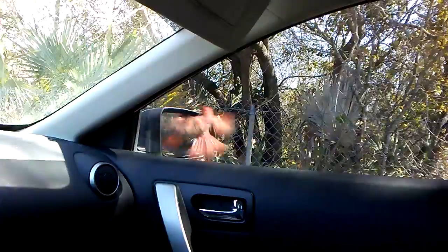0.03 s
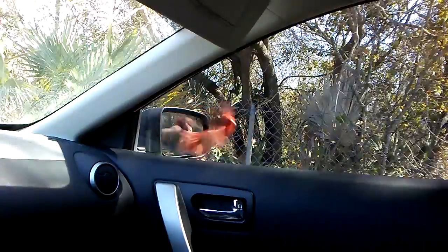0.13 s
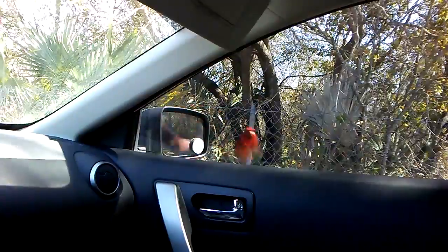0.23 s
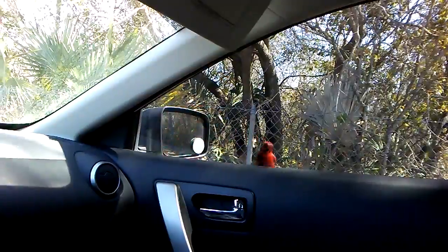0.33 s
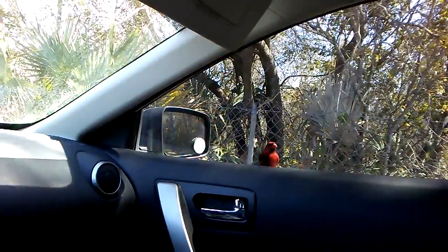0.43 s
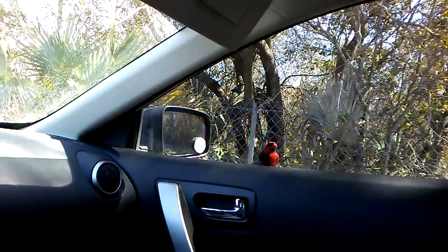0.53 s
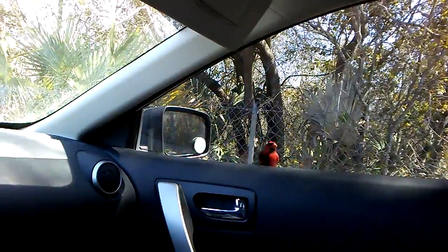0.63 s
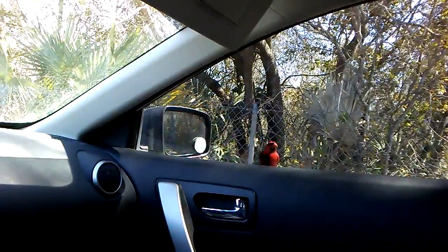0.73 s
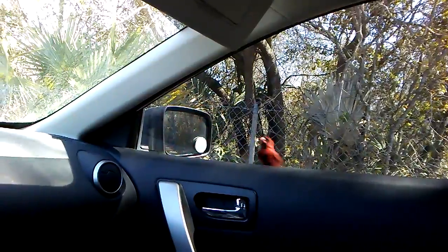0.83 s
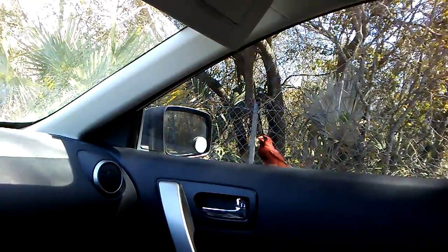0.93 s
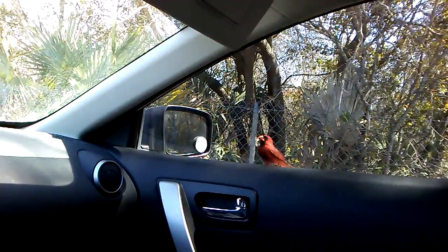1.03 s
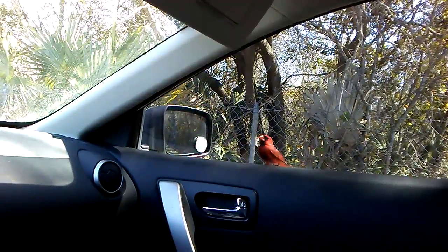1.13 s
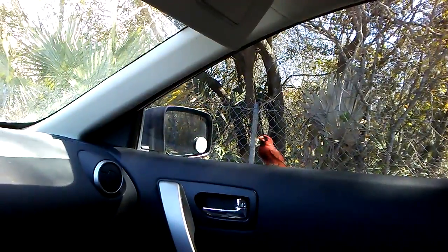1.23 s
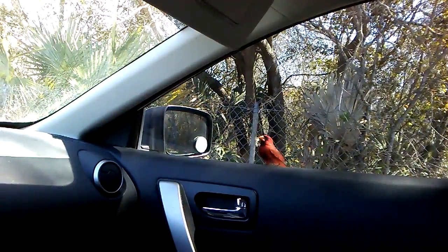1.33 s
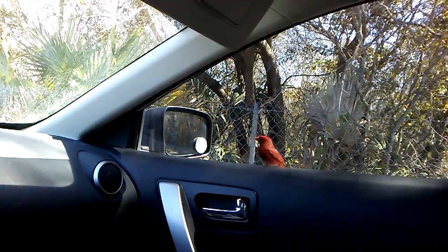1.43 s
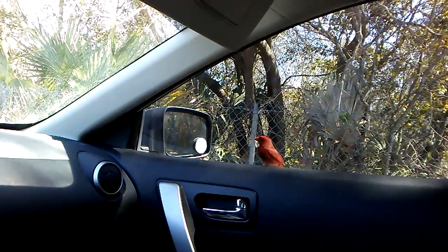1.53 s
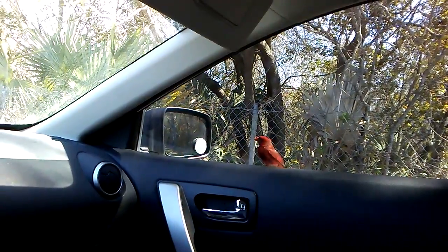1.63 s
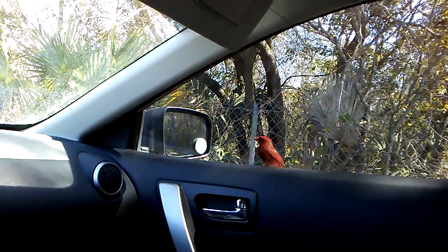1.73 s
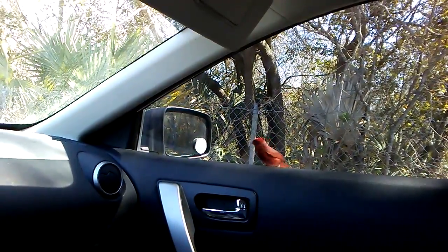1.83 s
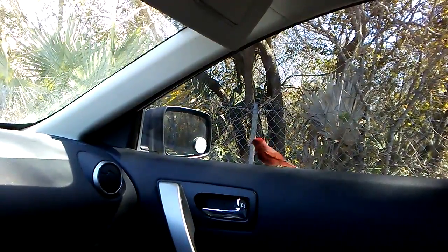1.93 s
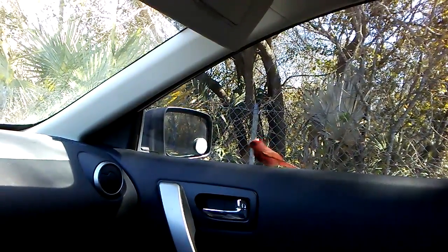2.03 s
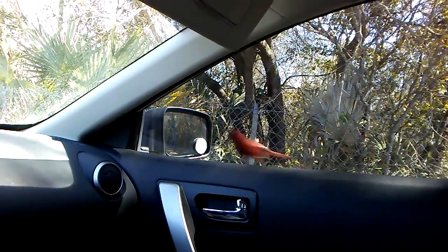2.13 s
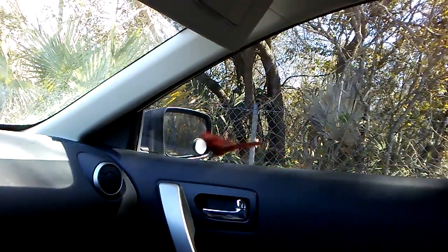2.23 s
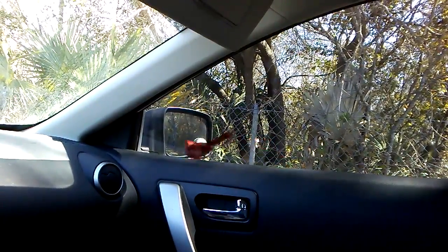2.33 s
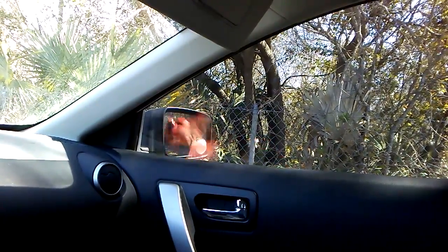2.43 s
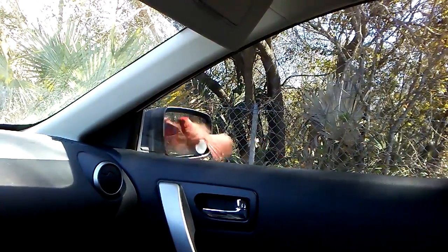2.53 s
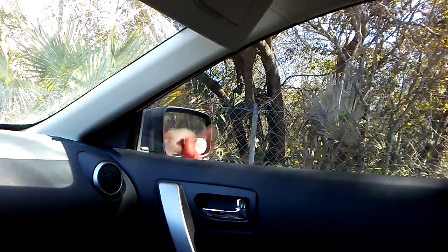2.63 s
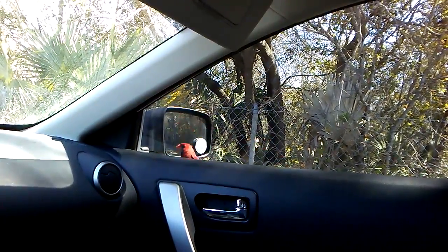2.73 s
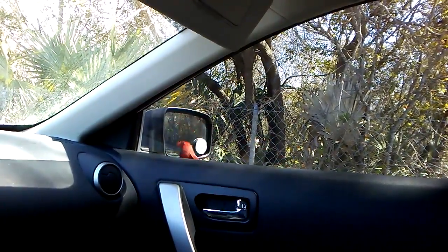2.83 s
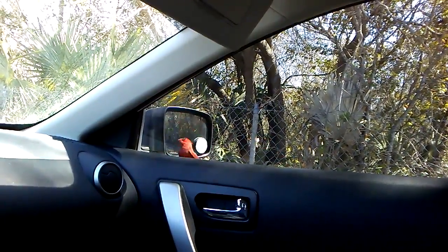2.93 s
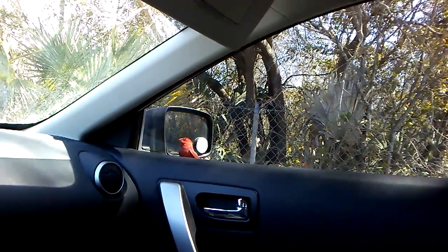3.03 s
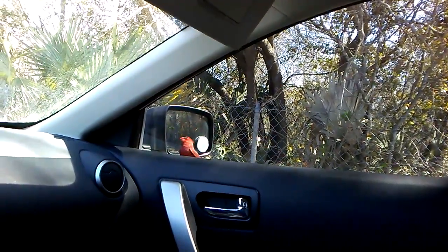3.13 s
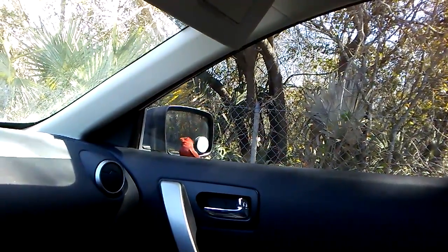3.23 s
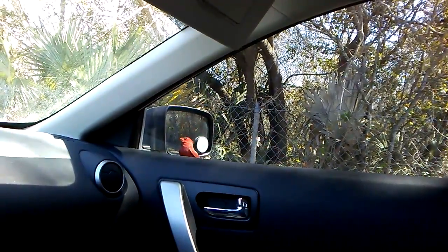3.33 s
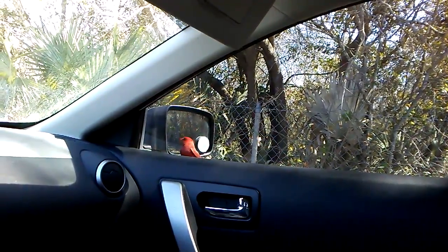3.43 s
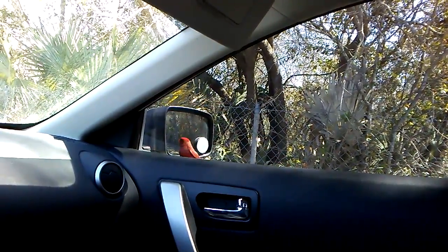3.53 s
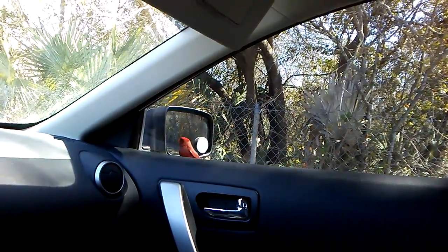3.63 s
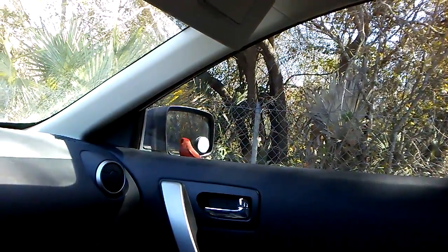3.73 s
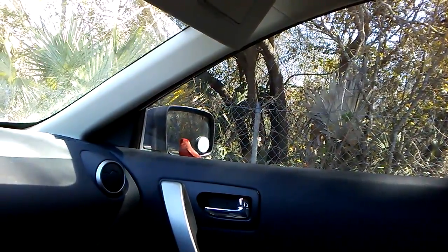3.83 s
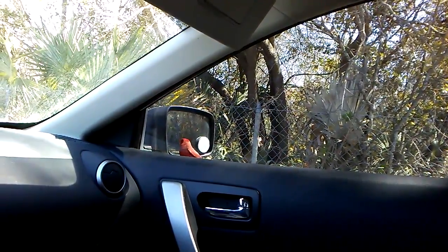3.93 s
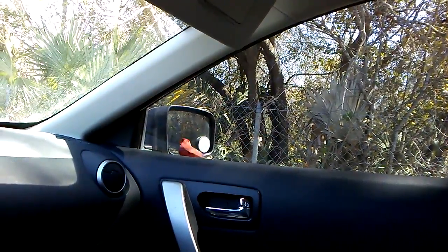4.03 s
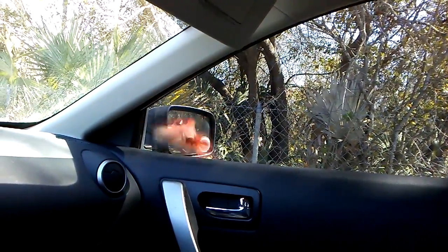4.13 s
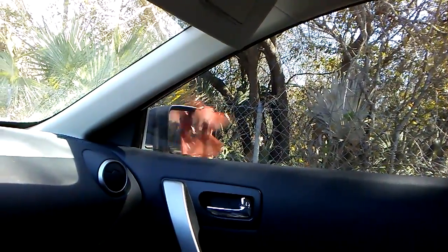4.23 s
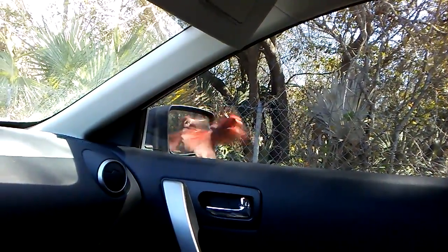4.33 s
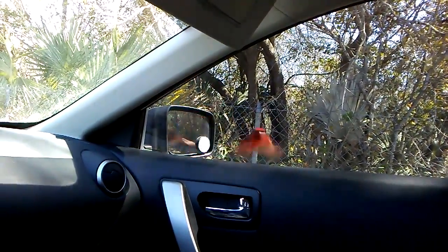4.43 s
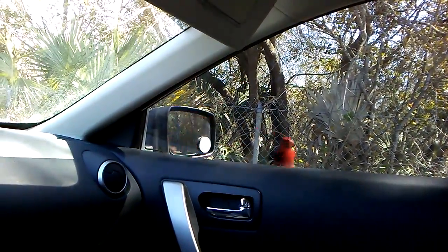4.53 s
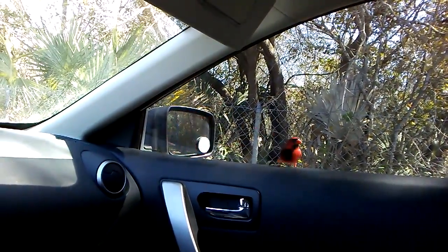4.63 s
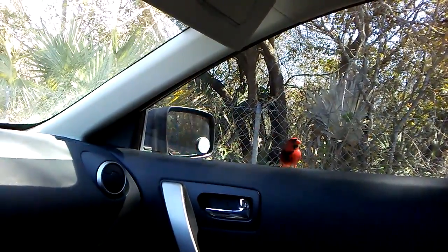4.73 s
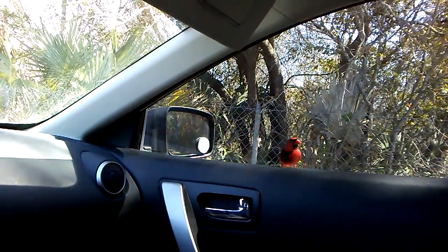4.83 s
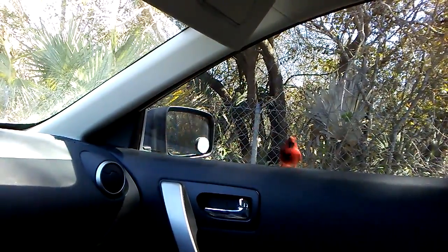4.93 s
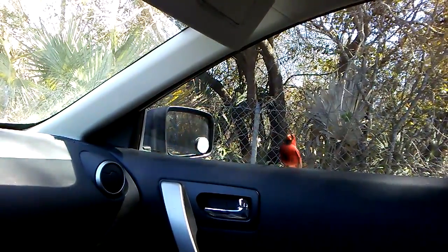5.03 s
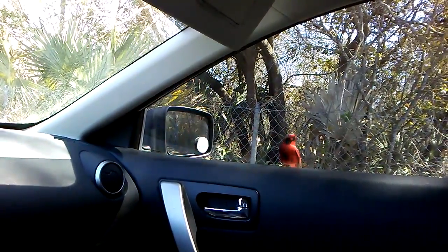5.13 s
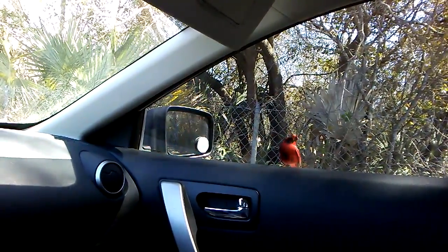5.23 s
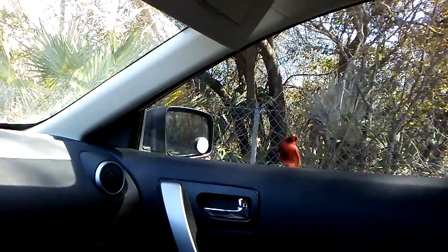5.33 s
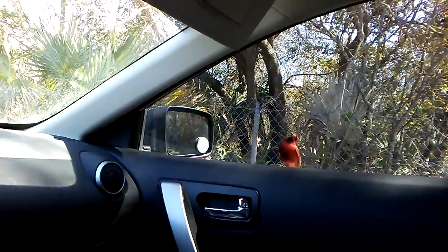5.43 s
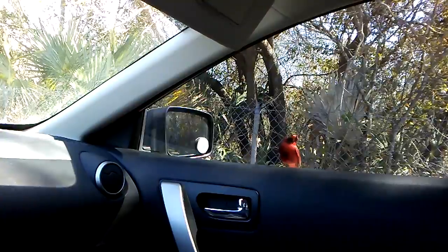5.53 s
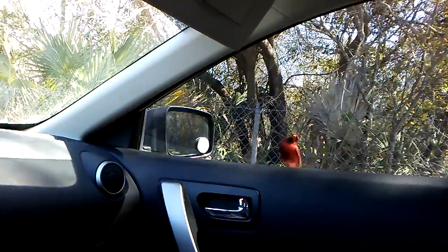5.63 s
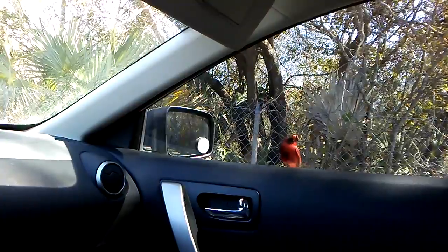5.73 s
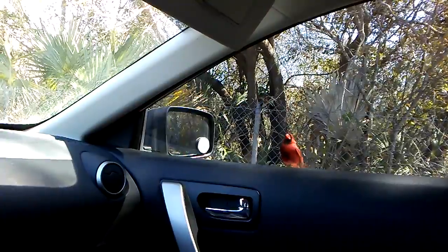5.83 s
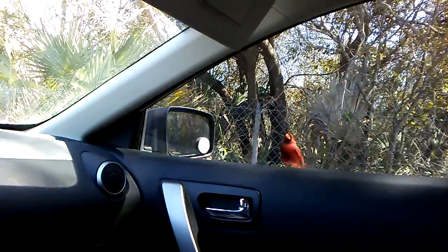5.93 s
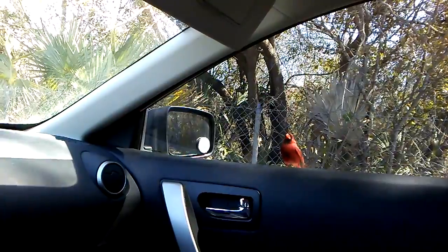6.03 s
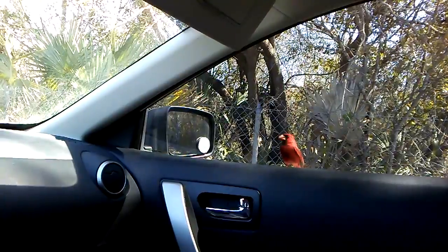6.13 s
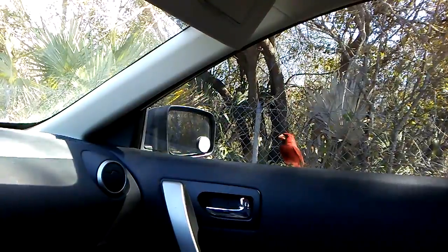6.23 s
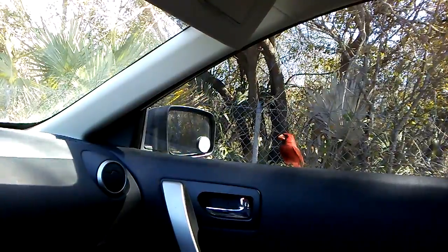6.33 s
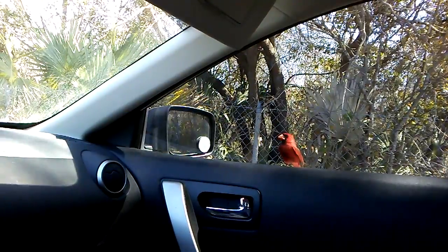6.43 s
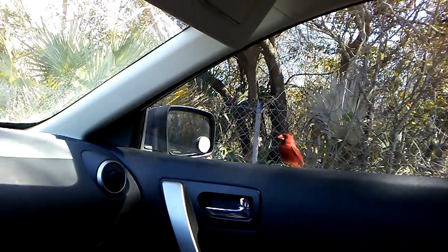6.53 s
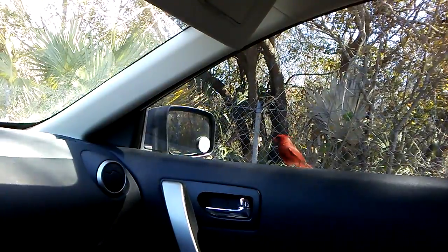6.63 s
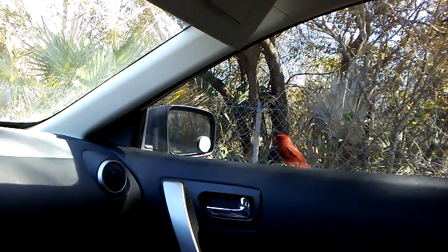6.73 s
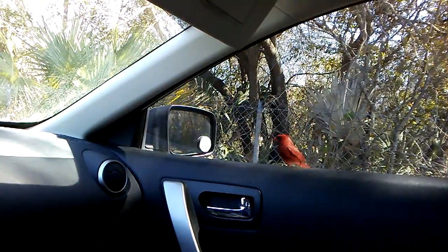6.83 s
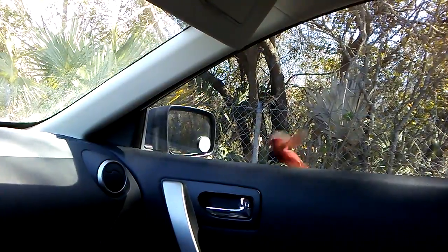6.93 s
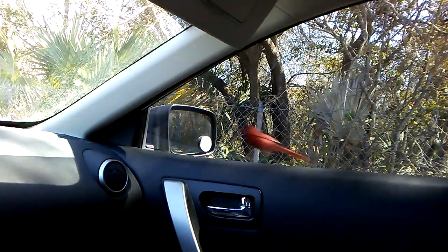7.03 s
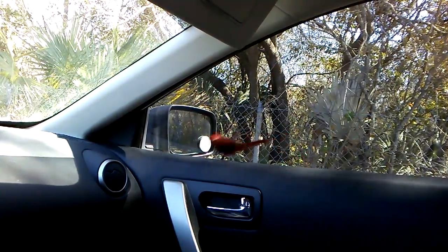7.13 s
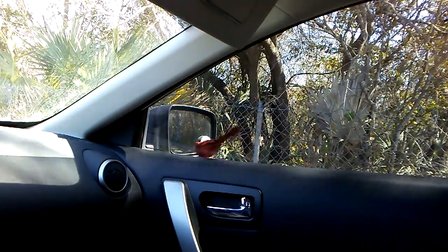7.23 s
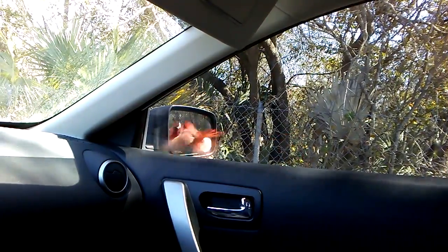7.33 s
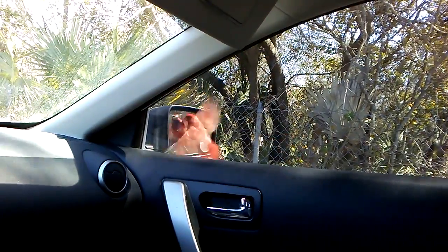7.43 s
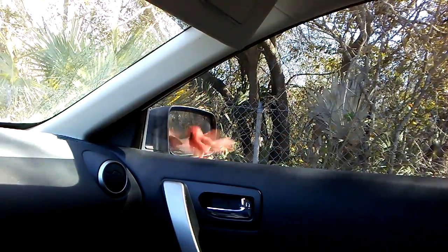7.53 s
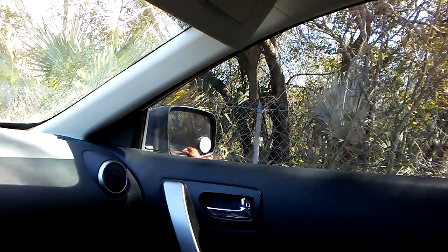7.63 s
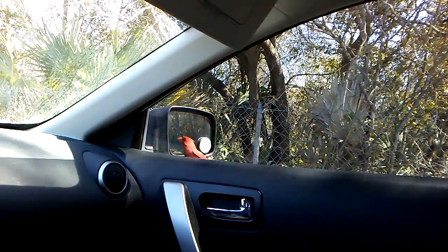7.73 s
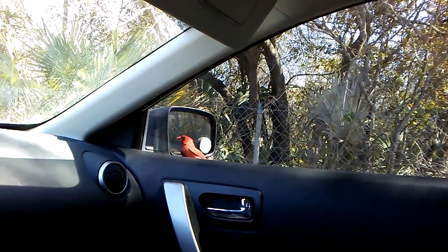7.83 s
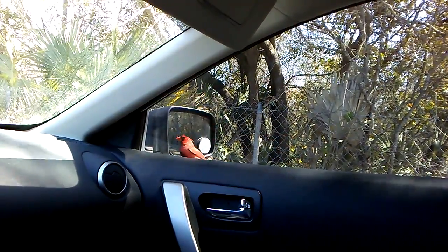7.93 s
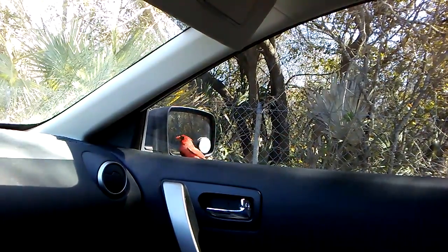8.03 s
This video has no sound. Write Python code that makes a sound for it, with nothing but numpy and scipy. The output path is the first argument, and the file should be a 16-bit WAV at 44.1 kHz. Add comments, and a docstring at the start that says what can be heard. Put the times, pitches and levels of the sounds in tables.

```python
"""A small bird knocks at the side mirror of a parked car, heard on a phone inside with the windows shut.
Between blows its claws tap and its feet and feathers scuff on the door ledge. Knocks and taps are short
pushes ringing decaying modes, with noise bursts for rattle; scuffs are grainy filtered noise.
Wind rumbles and thumps as resonant noise and short low tones; far engines drone as wavering tones.
Leaves and distant road come dulled through the glass, over the flickering hiss of the phone."""
import sys
import numpy as np
from scipy import signal
from scipy.fft import rfft, irfft, next_fast_len
from scipy.io import wavfile
from scipy.ndimage import uniform_filter1d

SR = 44100
rng = np.random.default_rng(int(sys.argv[2]) if len(sys.argv) > 2 else 0)


def put_to_file(sound):
    """Save the sound as 16-bit audio at rate SR, in the file named by the first command-line argument."""
    columns = np.atleast_2d(sound).T  # one column per channel
    safe = np.clip(columns, -1, 1)
    whole_steps = np.round(safe * 32767)
    wavfile.write(sys.argv[1], SR, whole_steps.astype(np.int16))


N = 356504

# modes of the door ledge and window pane: mode_hz, level_db, t60_s, polarity (sign at the microphone)
LEDGE_MODES = [(137.7, -38.5, 0.14, -1), (197, -33, 0.032, 1), (342, -41, 0.063, -1), (447, -39.5, 0.07, 1),
               (500, -50.5, 0.1, -1), (670, -55, 0.13, 1), (745, -74, 0.11, -1), (1092, -36.5, 0.068, 1),
               (1140, -36.5, 0.053, -1), (1350, -46, 0.054, 1), (1650, -42.5, 0.032, -1),
               (1715, -45, 0.073, 1), (1910, -42.5, 0.061, -1), (2003, -49, 0.035, 1),
               (2190, -52, 0.041, 1), (2434, -46.5, 0.05, -1), (2930, -52.5, 0.029, 1),
               (3480, -66, 0.086, -1)]


def undb(db):
    """Decibels to an amplitude factor."""
    return 10 ** (np.asarray(db) / 20)


def unit(x):
    """Scale to an rms of 1."""
    return x / np.sqrt(np.mean(x ** 2))


def walk(rate_hz):
    """A smooth random curve of rms 1: values held for 1 / rate_hz, then averaged twice over that time."""
    hold = int(SR / rate_hz)
    steps = np.repeat(rng.standard_normal(N // hold + 1), hold)
    return unit(uniform_filter1d(uniform_filter1d(steps, hold), hold)[:N])


def noise(gain):
    """Noise of rms 1 whose spectrum follows gain(Hz)."""
    size = next_fast_len(N)
    hz = np.arange(size // 2 + 1) * SR / size + 1  # 1 Hz up, to stay clear of zero
    spectrum = rfft(rng.standard_normal(size)) * gain(hz)
    return unit(irfft(spectrum, size)[:N])


def shape(table):
    """A spectral gain drawn through (Hz, dB) points, straight in dB over log frequency."""
    hz, db = np.transpose(table)
    return lambda f: undb(np.interp(np.log(f), np.log(hz), db))


def add(out, start_s, sound):
    """Mix a sound in at its start time, cut off at the end of the scene."""
    i = int(start_s * SR)
    out[i:i + len(sound)] += sound[:N - i]


def strike(modes, contact_ms, tilt_db, scatter_db, detune):
    """A short push rings every mode; a longer contact mutes the upper ones."""
    hz, db, t60, polarity = np.transpose(modes)[:, :, None]
    t = np.arange(int(.6 * SR)) / SR
    gain = np.sign(polarity) * undb(db + tilt_db[:, None] + scatter_db[:, None])
    tones = np.sin(2 * np.pi * hz * (1 + detune[:, None]) * t)
    decay = np.exp(-np.log(1000) * t / t60)
    ring = (gain * tones * decay).sum(0)
    push_t = t[:400]
    push = push_t * np.exp(-push_t * 1000 * 2 * np.pi / contact_ms)
    return np.convolve(ring, push / push.sum())


def rattle(db, low_hz, high_hz, t60, rise_ms):
    """The many upper modes of trim and glass, too dense to tell apart: a burst of noise that dies away."""
    t = np.arange(int(.25 * SR)) / SR
    band = signal.butter(3, [low_hz, high_hz], "band", fs=SR, output="sos")
    burst = unit(signal.sosfilt(band, rng.standard_normal(len(t))))
    rise = 1 - np.exp(-t * 1000 / rise_ms)
    return undb(db) * burst * rise * np.exp(-np.log(1000) * t / t60)


def hiss(split_hz=6500, low_flicker_db=1.5, high_flicker_db=0.8):
    """Electronic hiss, its two halves flickering apart, stepping up in each supply cycle; a faint whine."""
    # spectrum of the phone's electronics: frequency_hz, relative_density_db
    hiss_spectrum = [(880, -50), (1500, -7.5), (1810, -4), (2520, -2.5), (3060, -3.5), (3690, -4),
                     (15500, -8.5)]
    hiss_db, whine_db, whine_hz = -70.5, -99, 8000
    buzz_hz, buzz_start, buzz_share, buzz_db = 100, .42, .2, 1.3  # start and share in cycles
    t = np.arange(N) / SR
    gate = ((t * buzz_hz - buzz_start) % 1 < buzz_share) * 1.
    whine = undb(whine_db) * (1 + 2 * gate) * np.sin(2 * np.pi * whine_hz * t)  # tripled in the step
    steady = noise(shape(hiss_spectrum))
    low = signal.sosfiltfilt(signal.butter(2, split_hz, fs=SR, output="sos"), steady)
    high = steady - low
    flicker = low * undb(low_flicker_db * walk(60)) + high * undb(high_flicker_db * walk(35))
    return flicker * undb(hiss_db + buzz_db * gate) + whine


def outside(level_db=-67, swell_db=1.0, rustle_db=1.5):
    """Leaves and distant road, dulled by the glass: they swell together, each octave rustling on its own."""
    # outdoor air through the glass: frequency_hz, relative_density_db
    air_spectrum = [(88, -37), (150, 3.5), (189, -12), (253, -7.5), (328, -10), (496, -8), (728, -12.5),
                    (945, -13.5), (1160, -15.5), (2470, -25), (4000, -35.5), (5200, -53), (8800, -120)]
    size = next_fast_len(N)
    air = rfft(noise(shape(air_spectrum)), size)
    # octaves above 125 Hz; the end bands take all that lies beyond them
    octave = np.log2(np.arange(len(air)) * SR / size / 125 + 1e-9).clip(0, 5)
    bands = np.zeros(N)
    for k in range(6):
        band = irfft(air * (1 - abs(octave - k)).clip(0), size)[:N]  # neighbours crossfade
        bands += band * undb(rustle_db * walk(14))
    return bands * undb(level_db + swell_db * walk(0.92))


def drones(waver=0.0159):
    """Far engines: low wavering tones with a fading octave; each swells in, climbs slightly and fades."""
    # engine passages: start_s, length_s, pitch_hz, level_db, octave_db (against the pitch, at the start)
    engines = [(3.8, 1.88, 62.2, -50.5, -5), (2.186, 0.37, 69, -44, -35)]
    swell_s, fade_s = 0.22, 0.11
    climb_db_per_s, octave_sag_db_per_s = 0.5, 6
    out, t = np.zeros(N), np.arange(N) / SR
    for start_s, length_s, hz, db, octave_db in engines:
        since = t - start_s
        phase = 2 * np.pi * np.cumsum(hz * (1 + waver * walk(9.1))) / SR
        edges = np.clip(since / swell_s, 0, 1) * np.clip((start_s + length_s - t) / fade_s, 0, 1)
        octave = undb(octave_db - octave_sag_db_per_s * np.maximum(since, 0)) * np.sin(2 * phase)
        tone = np.sqrt(2) * (np.sin(phase) + octave)
        out += tone * edges ** 2 * undb(db + climb_db_per_s * since)
    return out


def rumble(flicker_db=2.0):
    """Gusty noise in the low resonances of the cabin, each flickering on its own."""
    # rise and fall of the gusts: time_s, level_db
    gusts = [(0.0, -50.5), (1.2, -61), (1.462, -53.5), (1.89, -58.5), (2.23, -53), (3.4, -54), (3.85, -59),
             (4.41, -48.5), (4.95, -59.5), (5.65, -55), (6.03, -59), (6.71, -57), (7.36, -58), (7.67, -50),
             (8.08, -58)]
    # cabin resonances: centre_hz, width_hz, level_db (over the gust curve)
    resonances = [(38.3, 7.1, -5.5), (47.3, 11, 1), (63.8, 38, -1.5), (95.2, 19.6, -2.5), (128.2, 21, -16),
                  (170, 120, -16)]
    bands = np.zeros(N)
    for hz, width_hz, db in resonances:
        band = noise(lambda f: 1 / (1 + ((f - hz * hz / f) / width_hz) ** 2))
        bands += undb(db + flicker_db * walk(8.3)) * band
    time_s, level_db = np.transpose(gusts)
    return bands * undb(np.interp(np.arange(N) / SR, time_s, level_db))


def thumps(length_cycles=3.36):
    """Gusts press on the car: a few cycles of cabin air that swell and fade."""
    # low thumps: start_s, peak_db, pitch_hz
    presses = [(0.129, -30.5, 68), (0.76, -39.5, 70), (1.392, -38, 62.5), (1.62, -38.5, 64),
               (2.084, -33.5, 86), (2.294, -39, 64), (3.112, -33.5, 61.4), (3.368, -39.5, 68),
               (4.852, -40, 73), (5.731, -37.5, 69.5), (6.608, -35, 60.6), (6.846, -37.5, 68.6)]
    out = np.zeros(N)
    for (start_s, db, hz), turn in zip(presses, rng.random(len(presses))):
        cycles = hz * np.arange(int(length_cycles / hz * SR)) / SR
        swell = np.sin(np.pi * cycles / length_cycles) ** 2
        add(out, start_s, undb(db) * swell * np.sin(2 * np.pi * (cycles + turn)))
    return out


def scuffs(grain_db=3.0, grain_ms=2.5, ledge_db=-4.5, even_share=0.67):
    """Grainy rubbing that starts quickly and fades; it rings the ledge modes more evenly than a tap does."""
    # feet and feathers on the ledge: start_s, level_db, pitch_hz
    rubs = [(0.46, -60.5, 237), (0.464, -74, 2000), (0.604, -72.5, 2400), (2.742, -71, 417),
            (2.797, -71, 1900), (2.81, -64, 275), (2.858, -76, 814), (4.651, -69, 2220), (4.665, -68, 800),
            (4.688, -60, 238), (4.809, -72, 626), (6.152, -72, 220), (7.274, -67.5, 248),
            (7.735, -74, 1990), (7.787, -67, 790), (7.79, -73.5, 2080), (7.798, -68.5, 330),
            (7.909, -71.5, 770), (7.918, -70.5, 328)]
    base_s, drag_cycles = 0.016, 9.8  # low scuffs drag on longer
    base_width_hz, width_share = 210, 0.36  # bandwidth: a base plus a share of the pitch
    out, still = np.zeros(N), np.zeros(len(LEDGE_MODES))
    even_db = -even_share * np.array(LEDGE_MODES)[:, 1]
    ledge = strike(LEDGE_MODES, 0.071, even_db, still, still)[:SR // 10]
    for start_s, db, hz in rubs:
        length_s = base_s + drag_cycles / hz
        t = np.arange(int(3 * length_s * SR)) / SR
        sizes = undb(grain_db * rng.standard_normal(SR // 100))[(t * 1000 / grain_ms).astype(int)]
        envelope = (t / length_s) ** 0.33 * np.exp(-2 * t / length_s)
        grains = rng.standard_normal(len(t)) * sizes * envelope
        peak = signal.iirpeak(hz, hz / (base_width_hz + width_share * hz), SR)
        rub = signal.lfilter(*peak, signal.lfilter(*peak, grains))
        ring = signal.fftconvolve(rub, ledge)
        add(out, start_s, undb(db) * unit(rub))
        add(out, start_s, undb(db + ledge_db) * ring / np.sqrt(np.sum(ring ** 2) / len(t)))
    return out


def taps(thud_hz=560, ring_hz=(1000, 1300), clack_hz=1950, scatter_db=1.0, detune=0.012):
    """Claws tick on the ledge, a softer second toe just after the first, with a rattle of trim and glass."""
    # claw taps: start_s, level_db, contact_ms, low_thud_db, pane_ring_db, bright_clack_db
    claws = [(0.51, -2.5, 0.19, -4.5, 2, -9), (0.9562, -7, 0.099, -2.5, -5, 3),
             (4.723, -5.5, 0.063, -3, -5.5, -2), (5.0927, -16, 0.19, 2, 0, 5.5)]
    toe_ms, toe_db = 6.0, -5  # second toe, against the first
    out, hz = np.zeros(N), np.array(LEDGE_MODES)[:, 0]
    chance = rng.standard_normal((len(claws), 4, len(LEDGE_MODES)))
    for (start_s, db, ms, thud_db, pane_db, clack_db), c in zip(claws, chance):
        pane = (hz > ring_hz[0]) * (hz < ring_hz[1])
        tilt_db = thud_db * (hz < thud_hz) + pane_db * pane + clack_db * (hz > clack_hz)
        first = strike(LEDGE_MODES, ms, tilt_db, scatter_db * c[0], detune * c[1])
        second = strike(LEDGE_MODES, ms, tilt_db, scatter_db * c[2], detune * c[3])
        add(out, start_s, undb(db) * first)
        add(out, start_s + toe_ms / 1000, undb(db + toe_db) * second)
        add(out, start_s, rattle(db - 43.5, 450, 2280, 0.13, 0.67))
        add(out, start_s, rattle(db + clack_db - 54.5, 3800, 5200, 0.015, 1.0))
    return out


def knocks(split_hz=220, crack_hz=1000, scatter_db=3.0, detune=0.01):
    """Each blow on the mirror lands a little differently, which changes only the upper modes."""
    # beak and body on the mirror: start_s, level_db, contact_ms, treble_db, crack_db
    blows = [(0.0658, -1.5, 1.34, 3.5, -3), (2.5778, 1.5, 1.56, 1.5, -6.5), (4.2947, -0.5, 1.44, 3.5, -1.5),
             (7.506, 1, 1.45, -0.5, -0.5)]
    # mirror, door and cabin air: mode_hz, level_db, t60_s, polarity (sign at the microphone)
    door_modes = [(64.2, -53.5, 0.77, 1), (74.8, -38, 0.5, 1), (89, -51, 0.19, 1), (109.35, -24, 0.33, 1),
                  (126.1, -19, 0.22, -1), (146.9, -35, 0.42, 1), (163.2, -34.5, 0.35, 1),
                  (173.1, -29.5, 0.13, 1), (186.7, -34.5, 0.22, -1), (234.3, -36, 0.21, 1),
                  (277, -44.5, 0.34, 1), (328, -35.5, 0.17, -1), (377.5, -44, 0.25, 1),
                  (431, -40, 0.16, -1), (592.7, -35, 0.081, 1), (661, -38, 0.099, -1),
                  (754, -42.5, 0.15, -1), (775, -43, 0.13, -1), (960, -51, 0.15, 1), (1124, -39.5, 0.1, 1),
                  (1240, -63, 0.038, -1), (1680, -80, 0.044, 1), (1880, -60, 0.059, -1),
                  (2440, -47.5, 0.071, 1)]
    out, hz = np.zeros(N), np.array(door_modes)[:, 0]
    upper = hz > split_hz
    chance = rng.standard_normal((len(blows), 2, len(door_modes)))
    for (start_s, db, ms, treble_db, crack_db), c in zip(blows, chance):
        tilt_db = treble_db * upper + crack_db * (hz > crack_hz)
        blow = strike(door_modes, ms, tilt_db, scatter_db * c[0] * upper, detune * c[1] * upper)
        add(out, start_s, undb(db) * blow)
        add(out, start_s, rattle(db + treble_db - 47.0, 240, 943, 0.18, 6))
        add(out, start_s, rattle(db + treble_db + crack_db - 53.5, 900, 1620, 0.13, 4.7))
    return out


def scene():
    """Everything that sounds at the microphone, in one channel."""
    background = outside() + drones() + rumble() + thumps()
    bird = scuffs() + taps() + knocks()
    return (background + bird)[None]


def record(dry, bass_hz=36, top_hz=15680):
    """The microphone loses the deepest bass and hisses; the top is cut steeply."""
    heard = signal.sosfilt(signal.butter(3, bass_hz, "high", fs=SR, output="sos"), dry) + hiss()
    return signal.sosfilt(signal.ellip(10, .2, 60, top_hz, fs=SR, output="sos"), heard)


dry = scene()
out = record(dry)
put_to_file(out)
```